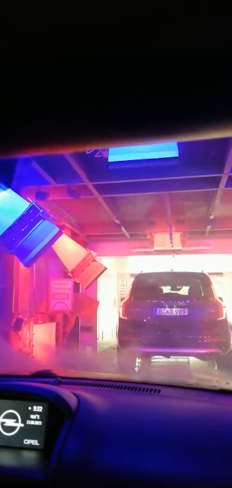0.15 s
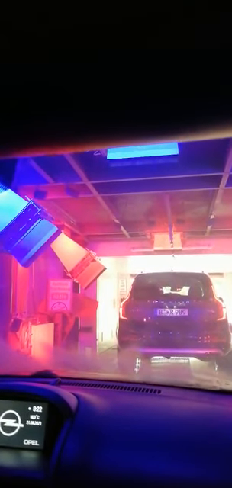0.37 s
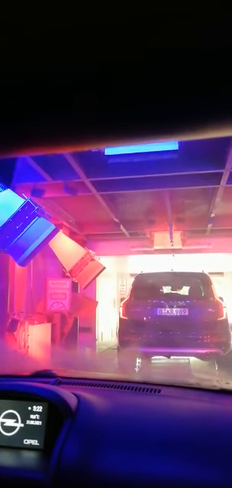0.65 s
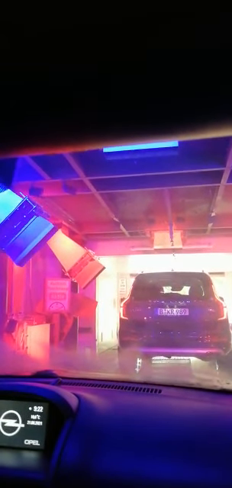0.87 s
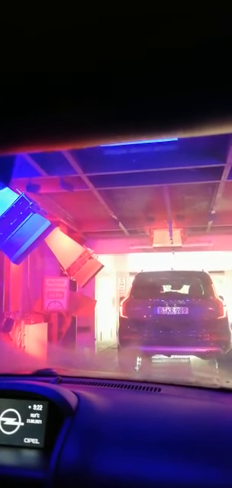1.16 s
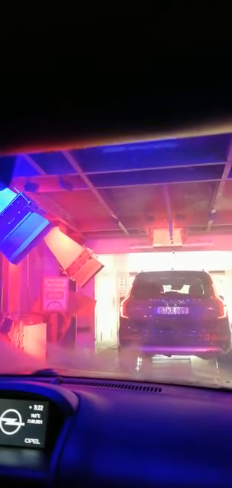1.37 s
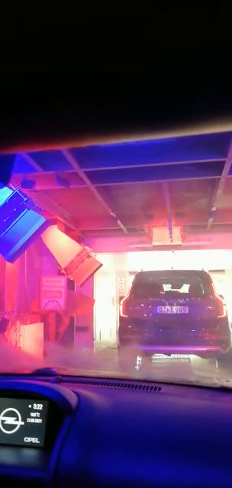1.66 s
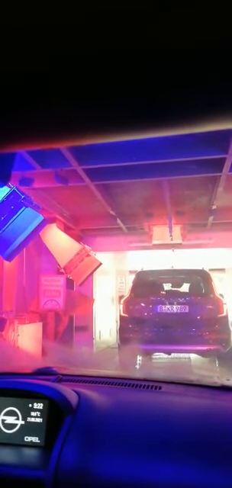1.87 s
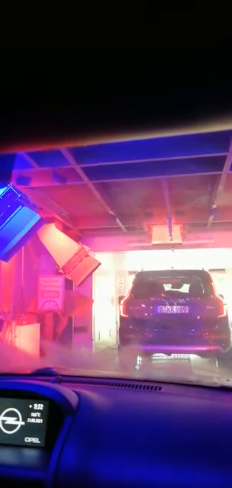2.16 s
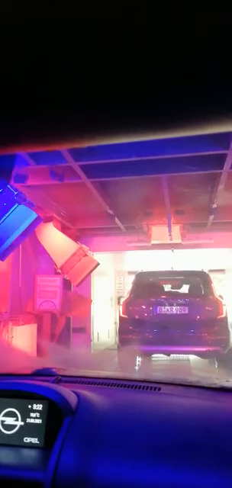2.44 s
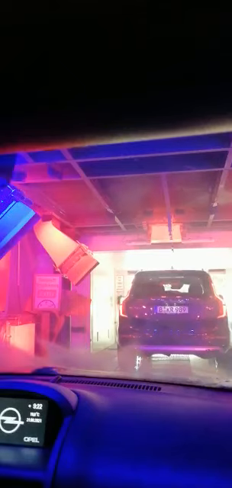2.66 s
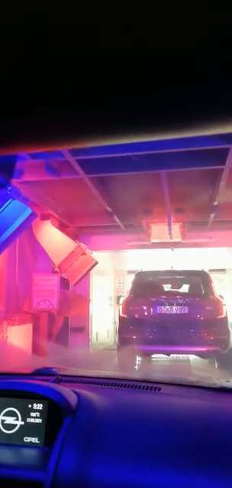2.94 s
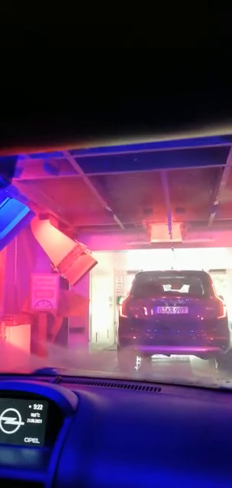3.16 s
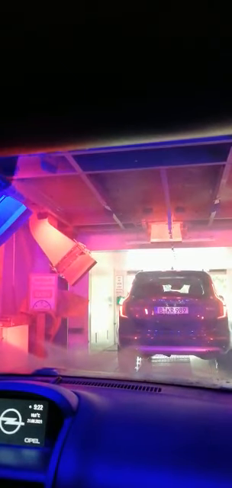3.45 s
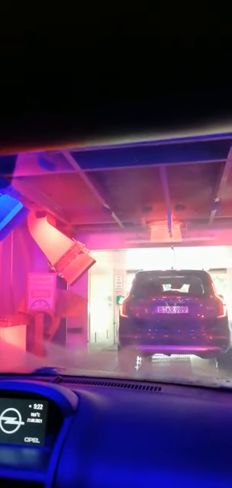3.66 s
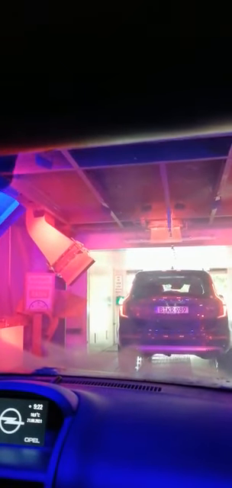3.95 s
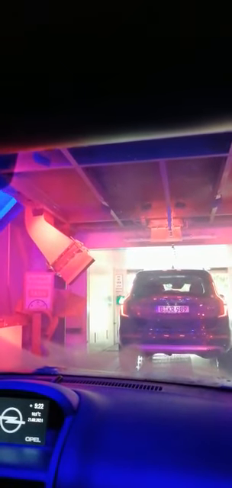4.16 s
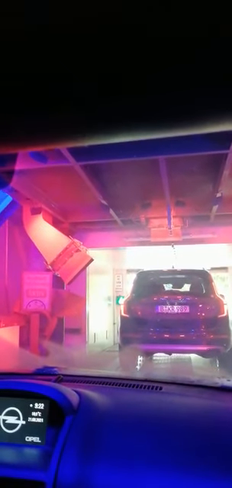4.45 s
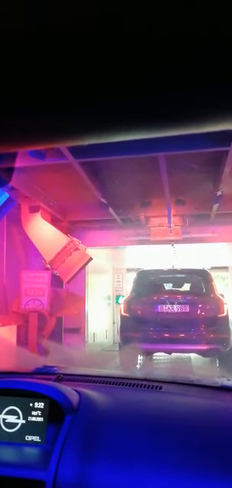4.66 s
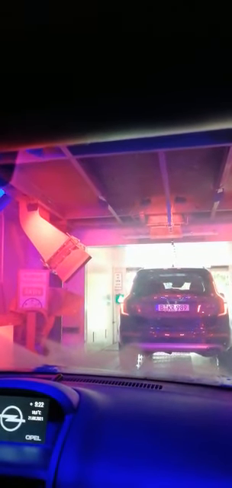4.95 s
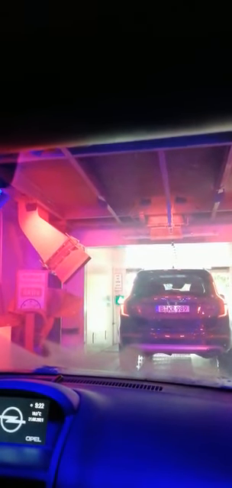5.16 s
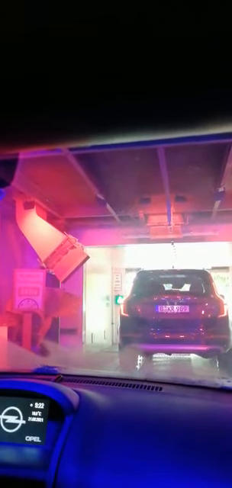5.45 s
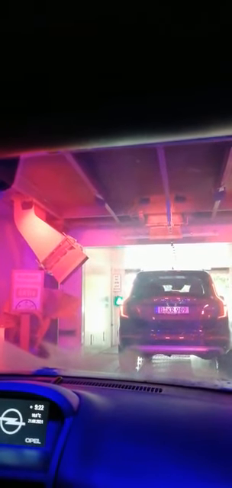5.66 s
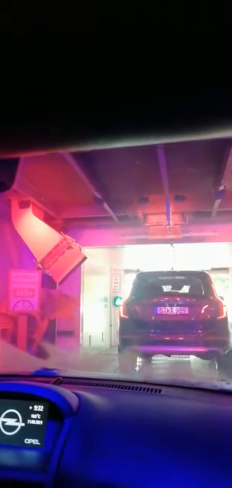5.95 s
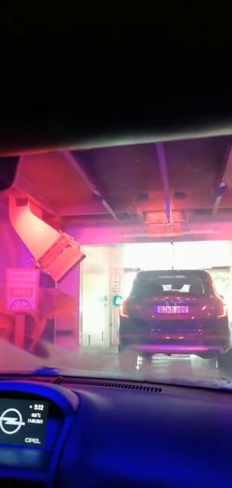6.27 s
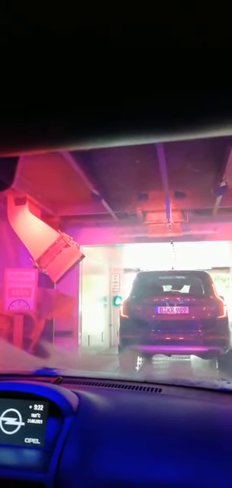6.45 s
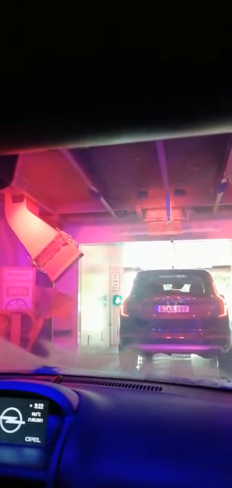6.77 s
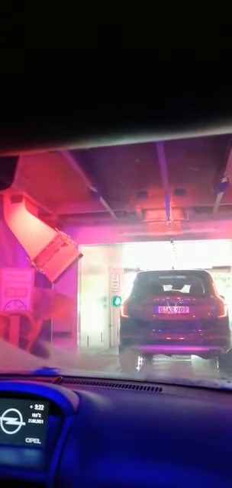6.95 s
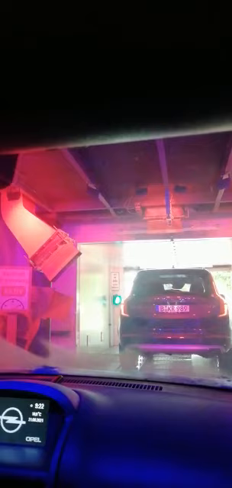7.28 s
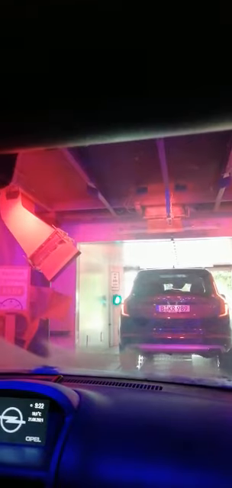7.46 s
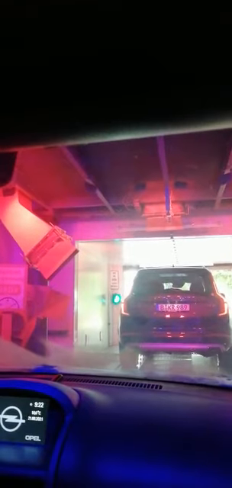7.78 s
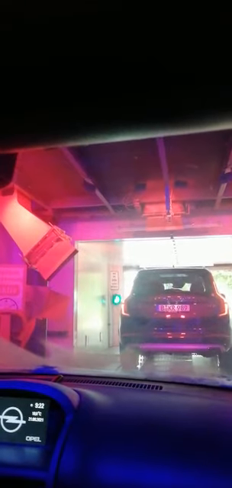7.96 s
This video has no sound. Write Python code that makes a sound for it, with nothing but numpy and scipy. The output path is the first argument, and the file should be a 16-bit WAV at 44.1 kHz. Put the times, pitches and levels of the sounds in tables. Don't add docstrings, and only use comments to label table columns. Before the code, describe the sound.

A microphone in a car cabin catches heavy, continuous dryer wind. The low rumble quickly grows, pulsing unevenly, and panels drum and moan. Two steady fan hums drift in and out beneath the muffled roar. Midway a thin, crackling hiss spits at a seal and fades; near the end a bright spray sweeps past with wet ticks, leaving the boom and roar.

```python
import sys
import numpy as np
from scipy import signal
from scipy.io import wavfile
from scipy.ndimage import uniform_filter1d

SR = 44100
rng = np.random.default_rng(int(sys.argv[2]) if len(sys.argv) > 2 else 0)


def materialize(psi):
    bounded = np.clip(np.atleast_2d(psi).T, -1, 1)
    quanta = np.round(bounded * 32767).astype(np.int16)
    wavfile.write(sys.argv[1], SR, quanta)


def field_ratio(decibels):
    return 10 ** (np.asarray(decibels, dtype=float) / 20)


N = 358091


def evened(x):
    return x / np.sqrt(np.mean(x ** 2) + 1e-20)


def wander(top_hz):
    t = np.arange(0, N + 256, 256) / SR
    drift = np.zeros(len(t))
    for hz in top_hz * np.geomspace(.04, 1, 30):
        drift += np.sin(2 * np.pi * (hz * t + rng.random())) / np.sqrt(hz)
    return np.interp(np.arange(N) / SR, t, evened(drift))


def air(colour, patchy_db, size=1024):
    bins_hz = np.fft.rfftfreq(size, 1 / SR)
    real, imag, patches = rng.standard_normal((4 * N // size + 5, len(bins_hz), 3)).T
    patches = uniform_filter1d(patches, size=9, axis=0)
    patches = evened(uniform_filter1d(patches, size=12, axis=1))
    hz, db = np.transpose(colour)
    shape_db = np.interp(np.log(bins_hz + 1), np.log(hz + 1), db, -120, -120)
    shape_db += .7 * rng.standard_normal(len(bins_hz))
    spectra = (real + 1j * imag) * field_ratio(shape_db[:, None] + patchy_db * patches)
    return evened(signal.istft(spectra, nperseg=size, noverlap=size - size // 4)[1][:N])


def entry(far_db, near_db, middle_s, spread_s):
    return far_db + (near_db - far_db) / (1 + np.exp((middle_s - np.arange(N) / SR) / spread_s))


def span(middle_s, length_s):
    first = max(round((middle_s - length_s / 2) * SR), 0)
    last = min(round((middle_s + length_s / 2) * SR), N)
    return first, last, np.cos(np.pi * (np.arange(first, last) / SR - middle_s) / length_s)


def swells(rows):
    out = np.zeros(N)
    for middle_s, length_s, db in rows:
        first, last, arch = span(middle_s, length_s)
        out[first:last] += db * arch ** 2
    return out


def opening(start, loudest, end, top_db, lost_db, bend):
    corners_s = [start - .06, start, loudest, end, end + .06]
    away = np.interp(np.arange(N) / SR, corners_s, [3, 1, 0, 1, 3])
    return field_ratio(top_db - lost_db * away ** bend) * (away < 3)


def steadied(x, share, span_s):
    count = int(span_s * SR)
    power = uniform_filter1d(uniform_filter1d(x ** 2, count), count)
    level = np.sqrt(power + 1e-3)
    return evened(x / level ** np.clip(share, 0, 1))


def burst(db, t60_s, count):
    t = np.arange(count) / SR
    return field_ratio(db - 60 * t / t60_s) * np.minimum(t / .005, 1)


# frequency in Hz, level in dB.
BOOM_COLOUR = [(5, -27), (9, -16.5), (15, -2), (22, 0.5), (32, 6.5), (45, -3), (58, -8), (75, -25.5),
               (100, -50.5)]
# frequency in Hz, level in dB.
DRUM_COLOUR = [(35, -37.5), (55, -8.5), (72, 3), (85, -1.5), (110, 1.5), (145, -1), (165, -5), (200, -4.5),
               (240, -9.5), (290, -17.5), (340, -22), (420, -44)]
# middle in seconds, change in dB.
EDDIES = [(.2, -8), (.81, 5), (1.11, -8.5), (1.7, 4.5), (1.87, -3.5), (3.05, 7.5), (3.16, -12), (3.39, 4.5),
          (3.71, -10), (3.96, 5.5), (4.65, -4), (5.13, -7), (5.36, 5), (5.47, -6.5), (5.78, 1.5),
          (5.92, -9), (6.4, 4), (6.689, 3.5), (6.95, -6), (7.04, 2.5), (7.19, -8.5), (7.44, 6), (7.62, -3),
          (7.94, 5.5), (8.12, -7)]
# middle in seconds, change in dB.
PANEL_GUSTS = [(.82, 2), (1.5, -0.5), (1.65, 2), (3.0, -1.5), (3.72, -0.5), (4.2, -1.5), (4.7, 2),
               (5.15, -1.5), (5.7, -0.5), (6.15, 1.5), (6.5, -2.5), (6.9, -3), (7.6, 0.5), (7.85, -1),
               (8.12, -0.5)]


def buffeting():
    eddy_s, gust_s = 0.21, 0.26
    eddy_db = swells([(s, eddy_s, db) for s, db in EDDIES])
    panel_db = swells([(s, gust_s, db) for s, db in PANEL_GUSTS])
    panel_db += -0.14 * eddy_db
    boom = steadied(air(BOOM_COLOUR, patchy_db=0.41, size=8192), share=0.41, span_s=0.056)
    boom *= field_ratio(entry(far_db=-34, near_db=-21.5, middle_s=0.57, spread_s=.5) + eddy_db)
    drum = steadied(air(DRUM_COLOUR, patchy_db=1.18, size=4096), share=0.34, span_s=0.23)
    drum *= field_ratio(entry(far_db=-30.5, near_db=-21.5, middle_s=2.5, spread_s=0.48) + panel_db)
    return boom + drum


# frequency in Hz, level in dB.
ROAR_COLOUR = [(200, -30.5), (280, -8.5), (320, -3), (380, 1), (430, -2), (540, 1.5), (600, -3.5),
               (640, -5.5), (700, -4), (850, -8.5), (1100, -13), (1400, -18.5), (1750, -23.5), (2000, -29),
               (2500, -58.5)]
# frequency in Hz, level in dB.
RUSH_COLOUR = [(1500, -26), (2020, -4), (2450, 0), (2850, -1.5), (3350, -6.5), (3600, -13), (3900, -15.5),
               (4550, -15), (4900, -10), (5150, -9.5), (5800, -10.5), (6600, -18.5), (7100, -21.5),
               (7600, -33.5)]
# middle in seconds, length in seconds, change in dB.
PASSING_JETS = [(0.0, 0.96, 2), (2.25, 0.33, 0.5), (3.3, .35, 0), (3.9, .3, 0.5), (4.3, 0.87, 0.5),
                (5.5, 0.43, -2.5), (5.9, 0.66, 0), (6.25, 0.21, -2), (6.6, 0.33, 0.5), (6.85, 0.25, -1.5),
                (7.1, 1.1, 0.5), (8.15, 2.2, -2)]


def roar():
    gust_db = 0.55 * wander(150) + swells(PASSING_JETS)
    low_db = entry(far_db=-36, near_db=-32, middle_s=4.5, spread_s=1) + gust_db
    rush_db = entry(far_db=-57, near_db=-54, middle_s=5, spread_s=2) + gust_db
    return field_ratio(low_db) * air(ROAR_COLOUR, patchy_db=1.0) + field_ratio(rush_db) * air(RUSH_COLOUR, patchy_db=0.55)


FAN_HZ = [582.4, 526.6]
FAN_DB = [-48.5, -56]
# multiple of the blade tone, level in dB.
FAN_ORDERS = [
    [(1, -1.5), (2, -23)],
    [(1, 1.5), (2, -9), (3, -23.5)],
]
# middle in seconds, length in seconds, change in dB.
FAN_SWELLS = [
    [(.5, 0.56, 11.5), (.78, 0.43, 8.7), (.1, .3, 4), (1.2, .3, 3), (1.6, .2, 4), (3.3, .5, 4),
     (1.85, 0.23, 4.4), (2.4, .5, 6.6), (2.7, 0.2, 5.8), (3.85, 0.48, 6.8), (4.35, 0.36, 8.6), (5.2, 1, 3),
     (6.05, .4, 5), (6.55, 0.37, 12.7), (7.05, 0.6, 9.4)],
    [(0.2, 0.8, 9), (1.2, .8, -8), (2.3, .4, 7), (3.5, 0.46, 3.5), (4.5, 0.6, -6), (5.65, 0.96, 11.5),
     (6.12, 0.19, 17.5), (7.1, 0.83, 7), (7.7, 0.43, 6)],
]


def fans():
    out = np.zeros(N)
    for hz, orders, steady_db, rows in zip(FAN_HZ, FAN_ORDERS, FAN_DB, FAN_SWELLS):
        phase = 2 * np.pi * np.cumsum(hz + .6 * wander(4)) / SR
        path_db = steady_db + swells(rows)
        for multiple, db in orders:
            level_db = path_db + db + .9 * wander(5.5)
            out += field_ratio(level_db) * np.sqrt(2) * np.sin(multiple * phase)
    return out


# middle in seconds, length in seconds, pitch in Hz, width in Hz, level in dB.
MOANS = [(0.72, 0.39, 556, 14, -45), (4.03, 1.47, 370, 25, -38), (4.84, 0.66, 204, 99, -30.5),
         (5.1, 1.55, 748, 240, -40), (7, 0.93, 5350, 280, -63.5), (6.806, 0.7, 3900, 900, -66),
         (6.93, 0.88, 5400, 600, -62), (6.7, .6, 4200, 1000, -66.5), (6.75, .2, 5500, 200, -60),
         (6.97, 0.27, 5300, 880, -56.5), (2.9, 1.3, 690, 46, -47), (5.1, .7, 806, 370, -44),
         (6.5, 1.8, 724, 140, -45), (.1, 0.78, 680, 30, -46), (5.5, .4, 3100, 380, -61),
         (5.156, 0.36, 90, 46, -23), (6.094, 1.3, 1130, 28, -53), (6.949, 1.5, 1630, 120, -56.5),
         (7.307, 2, 446, 90, -36.5), (7.502, 1.01, 277, 99, -32)]
# middle in seconds, pitch in Hz, level in dB.
PANEL_RINGS = [(.1, 141, -33), (.9, 149.7, -33), (1.299, 200, -39.5), (1.751, 111, -35), (1.9, 470, -41),
               (2.301, 470, -40), (2.5, 160, -31.5), (2.75, 106.3, -29.5), (2.951, 283, -39.5),
               (3.3, 95.4, -30), (3.301, 148.4, -33), (3.95, 136.7, -25.5), (3.9, 277, -37.5),
               (4.299, 99.7, -23.5), (4.3, 204, -33), (4.3, 700, -43), (4.85, 292, -37.5), (4.9, 383, -38),
               (5.1, 875, -47), (5.0, 159.4, -27), (5.4, 114, -28.5), (5.6, 215, -33.5), (5.9, 415, -39),
               (5.95, 494, -40.5), (6.05, 106.7, -27), (6.15, 152, -29.5), (6.2, 206, -38.5),
               (6.85, 279, -34), (7.1, 101.5, -25), (7.15, 477, -43), (7.5, 150, -29.5),
               (7.6, 121.3, -27.5), (1.499, 150, -34), (2.4, 68.8, -29.5), (3.5, 342, -41.5),
               (4.15, 73.7, -27.5), (5.15, 70, -27.5), (6.4, 255, -32.5), (7.0, 211, -31),
               (7.55, 232, -31.5), (7.9, 76, -25), (.7, 687, -42.5), (4.65, 199, -32.5), (2.7, 150, -31.5),
               (3.45, 262, -41), (1.7, 386, -43.5), (5.5, 294, -38), (.9, 209, -38)]
# middle in seconds, length
# in seconds, pitch in Hz, width in Hz, level in dB.
MORE_MOANS = [(6.2, .75, 5350, 250, -63.5), (6.2, .7, 4250, 700, -68), (5.05, .6, 840, 70, -46.5),
              (4.95, .4, 700, 60, -45), (5.2, 0.13, 6400, 250, -63.5), (7.15, .12, 5550, 220, -62),
              (5.9, .2, 3000, 300, -60), (6.75, .5, 2850, 300, -63), (4.55, .3, 6250, 200, -64),
              (5.05, .5, 932, 90, -48.5), (6.0, .3, 3000, 200, -63), (6.93, .08, 5000, 500, -59),
              (4.45, .35, 147, 30, -29), (3.7, .35, 105, 26, -30), (3.85, .4, 1450, 200, -56)]


def moans():
    out = np.zeros(N)
    ring_s, ring_width = .4, 0.19
    rings = [(s, ring_s, hz, ring_width * hz, db) for s, hz, db in PANEL_RINGS]
    for s, length_s, hz, width_hz, db in [*MOANS, *rings, *MORE_MOANS]:
        turbulence = rng.standard_normal(N // 3)
        first, last, arch = span(s, length_s)
        edges_hz = [hz - width_hz / 2, hz + width_hz / 2]
        band = signal.butter(2, edges_hz, "bandpass", fs=SR, output="sos")
        tone = evened(signal.sosfilt(band, turbulence[:last - first]))
        out[first:last] += field_ratio(db) * arch * steadied(tone, share=0.3, span_s=1 / width_hz)
    return out


# frequency in Hz, level in dB.
SWEEP_HIGH_COLOUR = [(1200, -13.5), (1600, 3.5), (2200, -9), (3600, -12), (4300, -6.5), (4800, -8.5),
                     (5400, 0), (5900, -1.5), (6800, -7), (7400, -14), (7700, -35.5)]
# start in seconds, peak level in dB, 60 dB decay in seconds.
SNAPS = [
    (1.2394, -57, 0.076),
    (6.0253, -52, 0.065),
    (6.2673, -54, 0.068),
    (6.4144, -54, .05),
    (6.6058, -47, 0.062),
    (6.9073, -51, 0.19),
    (7.0226, -50, 0.072),
    (7.1368, -54, 0.07),
    (7.378, -47, 0.091),
]


def snaps():
    out = np.zeros(N)
    highpass = signal.butter(4, 4600, "highpass", fs=SR, output="sos")
    thin = evened(signal.sosfilt(highpass, air(SWEEP_HIGH_COLOUR, patchy_db=1.3, size=512)))
    for s, db, t60_s in SNAPS:
        at = slice(round(s * SR), round(s * SR) + SR // 4)
        out[at] += burst(db, t60_s, count=SR // 4) * thin[at]
    return out


# frequency in Hz, level in dB.
SEAL_COLOUR = [(5000, -43), (5300, -14), (5500, -5.5), (5750, 2), (5950, -2), (6200, -2.5), (6500, -2.5),
               (6850, -10.5), (7050, -14.5), (7500, -30), (7700, -39.5)]
# middle in seconds, length in seconds, change in dB.
LEAK_FLAPS = [
    (3.85, .16, 8.5),
    (3.94, .05, 2),
    (4.42, .1, -3),
    (4.69, 0.078, 1),
    (4.79, .1, -2),
    (5.08, 0.087, -1),
    (5.19, .14, 3),
    (5.38, 0.091, 1),
]
# start in seconds, peak level in dB, centre in Hz.
SPURTS = [(3.5022, -43.5, 5900), (3.5406, -48, 5610), (3.6579, -44, 5820), (3.7142, -52, 6160),
          (3.7681, -44, 5850), (3.794, -41, 5840), (3.9058, -39, 6170), (3.9507, -48, 5920),
          (3.9687, -40, 6200), (3.99, -35.5, 5700), (4.039, -39, 5730), (4.051, -41, 5890),
          (4.1048, -44, 5870), (4.1358, -34.5, 5800), (4.1857, -45, 6190), (4.2151, -48, 5700),
          (4.24, -51, 5760), (4.264, -44, 6170), (4.2994, -50, 6180), (4.3139, -45, 6180),
          (4.3433, -43, 5620), (4.3563, -45, 5850), (4.4007, -43, 5780), (4.476, -37, 5630),
          (4.5274, -35.5, 6050), (4.5523, -42, 5660), (4.6017, -39, 5590), (4.6401, -45, 6190),
          (4.6706, -50, 5810), (4.7194, -38, 5890), (4.8132, -52, 6330), (4.8442, -49, 5880),
          (4.8811, -39, 5880), (4.912, -42, 5900), (4.9519, -48, 5840), (4.9833, -46, 5640),
          (5.0297, -49.5, 5870), (5.0492, -53, 5900), (5.0896, -50, 6220), (5.1175, -40, 6190),
          (5.2028, -49, 5620), (5.2602, -57, 5550), (5.3151, -60, 5770), (5.3829, -47, 5720),
          (5.4618, -53, 5570), (5.4797, -48, 6140), (5.563, -53, 5720)]


def seal():
    hiss = air(SEAL_COLOUR, patchy_db=0.91, size=512)
    gap = opening(start=3.77, loudest=4.08, end=5.6, top_db=-55, lost_db=15.5, bend=1.25)
    out = gap * field_ratio(-1.5 + swells(LEAK_FLAPS) + 1.3 * wander(300)) * hiss
    count = SR // 8
    for s, db, hz in SPURTS:
        at = slice(round(s * SR), round(s * SR) + count)
        band = signal.butter(1, [hz * .95, hz * 1.05], "bandpass", fs=SR)
        ring = burst(db - 10.5, .08, count) * evened(signal.lfilter(*band, hiss[at]))
        tick = burst(db - 13, .04, count) * hiss[::-1][at]
        out[at] += ring + tick
    return out


# frequency in Hz, level in dB.
SWEEP_LOW_COLOUR = [(2000, -27.5), (2600, -3.5), (2950, 3), (3300, 3.5), (3700, -11), (4500, -25),
                    (5350, -9), (5700, -17.5), (7000, -18.5), (7600, -30)]


def sweep():
    flutter = field_ratio(1.3 * wander(120))
    early = opening(start=5.82, loudest=6.3, end=7.36, top_db=-55, lost_db=8, bend=1.8)
    late = opening(start=5.82, loudest=6.95, end=7.45, top_db=-53.5, lost_db=12.5, bend=0.72)
    low = early * air(SWEEP_LOW_COLOUR, patchy_db=1.1, size=512)
    bright = late * air(SWEEP_HIGH_COLOUR, patchy_db=1.3, size=512)
    return flutter * (low + bright)


def scene():
    return (buffeting() + roar() + fans() + moans() + snaps() + seal() + sweep())[None]


def band_limit(x):
    return signal.sosfilt(signal.butter(12, 7670, fs=SR, output="sos"), x)


def record(dry):
    soft = 0.61 * np.tanh(dry / .6)
    padded = np.pad(soft, ((0, 0), (255, 255)), "reflect", reflect_type="odd")
    lowpass = signal.firwin(511, 7540, window=("kaiser", 9), fs=SR)
    mix = signal.oaconvolve(padded, lowpass[None], "valid")
    return band_limit(mix)


dry = scene()
out = record(dry)
materialize(out)
```